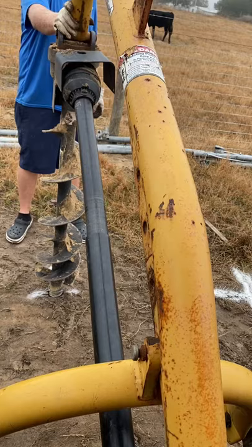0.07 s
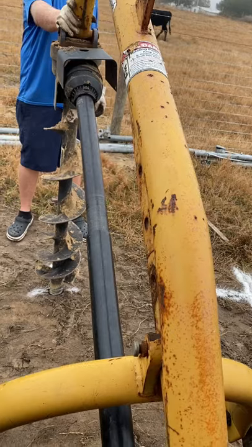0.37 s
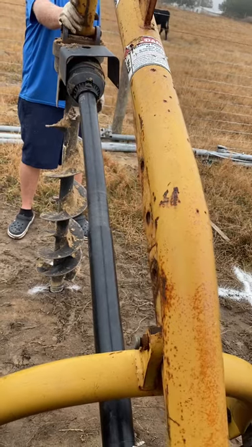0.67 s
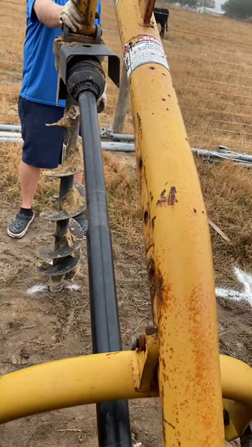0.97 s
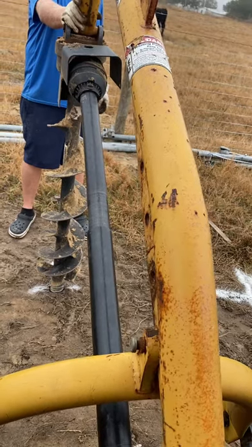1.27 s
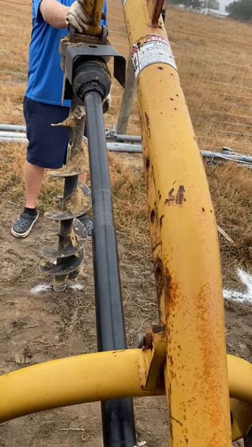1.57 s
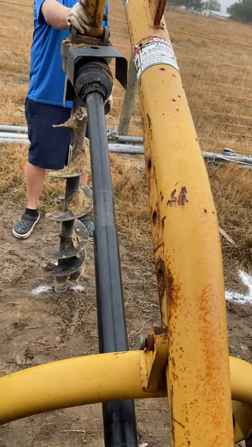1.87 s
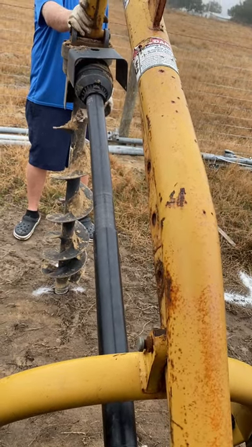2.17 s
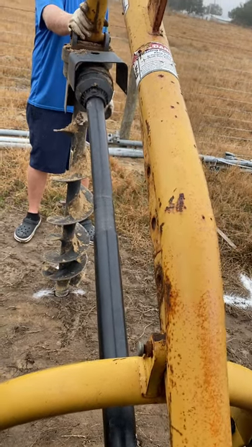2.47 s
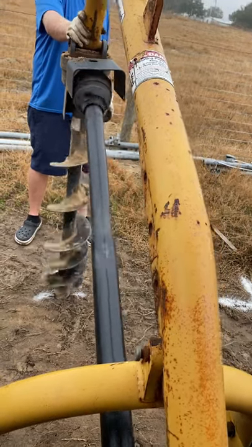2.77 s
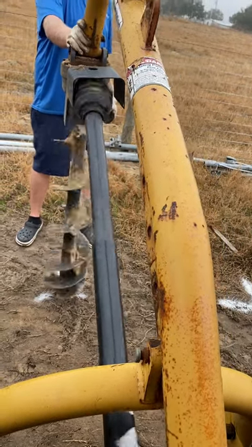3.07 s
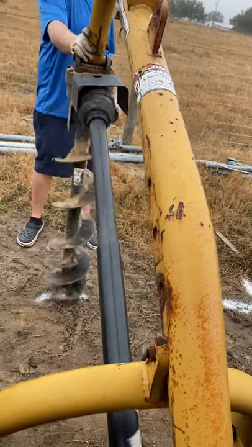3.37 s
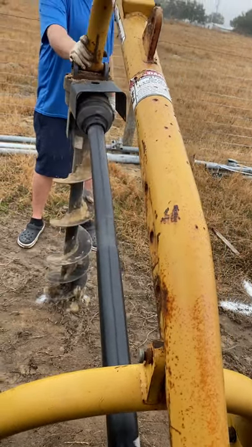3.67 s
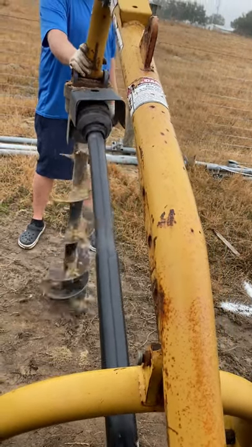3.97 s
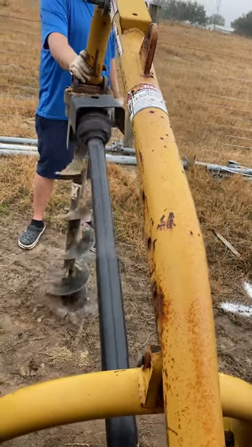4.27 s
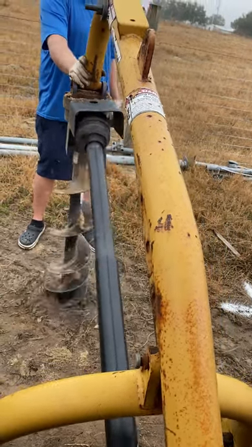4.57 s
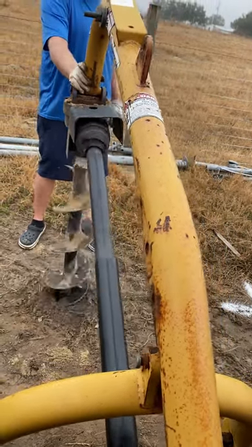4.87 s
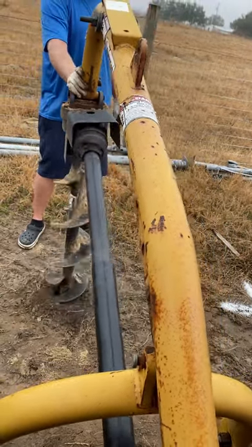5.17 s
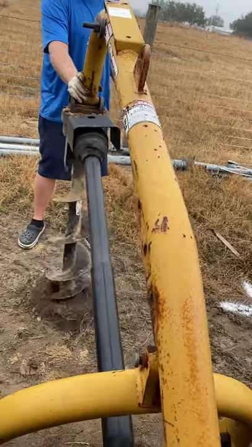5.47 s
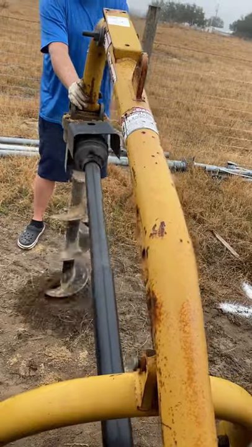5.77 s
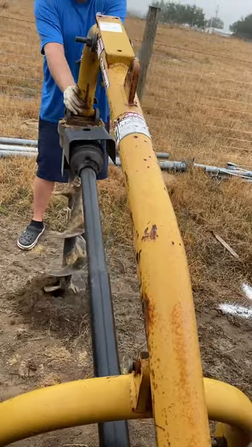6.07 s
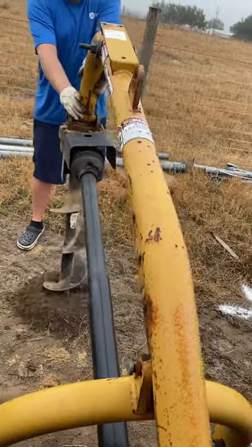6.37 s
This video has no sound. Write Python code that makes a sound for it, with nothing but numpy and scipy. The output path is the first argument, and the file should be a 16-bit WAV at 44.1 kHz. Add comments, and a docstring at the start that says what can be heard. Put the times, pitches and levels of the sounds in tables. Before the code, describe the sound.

A diesel tractor drones and clatters close by in an open field, with a steady hydraulic whine. A sharp steel clank comes first, then a short hiss of oil. A post-hole auger starts to turn, its shaft squeaking and its gearbox rattling in a quick, even rhythm. As it bites into dry soil, the blade groans and chatters louder, and grit sprays against the steel.

```python
"""In an open field a diesel tractor drones and clatters, its hydraulic pump whines and a steel linkage clanks.
Oil hisses through a valve as the boom comes down, and a post-hole auger starts to turn in dry soil.
Once a turn of its drive shaft the auger binds: stick-slip friction rings the flights and the blade,
harder as it bites deeper, while the gearbox rattles, the dry shaft squeaks and grit strikes the steel."""
import sys
import numpy as np
from scipy import signal
from scipy.fft import rfft, irfft, next_fast_len
from scipy.io import wavfile

SR = 44100
rng = np.random.default_rng(int(sys.argv[2]) if len(sys.argv) > 2 else 0)


def master(y):
    """Save y as 16-bit WAV."""
    cut = np.clip(np.atleast_2d(y).T, -1, 1)
    pcm = np.round(cut * 32767)  # scale
    wavfile.write(sys.argv[1], SR, pcm.astype(np.int16))


N = 283563
TIME = np.arange(N) / SR
SIZE = next_fast_len(N + SR // 4, True)
FREQS = np.maximum(np.arange(SIZE // 2 + 1) * SR / SIZE, 1)
PUMP_BEATS_PER_CYCLE = 26.24

# Balance of the two microphone ports. Each row: frequency in Hz, left minus right in dB.
PORT_BALANCE = [(60, 0), (230, 1.2), (350, 3), (700, .3), (1400, 1.5), (3000, -1.2), (7000, 0)]
# The auger binds once a turn. Each row: time in seconds, then levels in dB of the flights' groan,
# the gearbox's rattle and the blade's chatter.
AUGER_BINDS = [(2.693, -26, -29, -35), (2.855, -43, -27.5, -51), (3.005, -27, -27, -42),
               (3.144, -50, -29, -49), (3.285, -41, -28, -43), (3.435, -38, -26, -42),
               (3.582, -23, -28.5, -48), (3.731, -22, -27, -36), (3.882, -23, -23.5, -24),
               (4.018, -19, -26.5, -20.5), (4.183, -24.5, -27, -17), (4.321, -19, -24, -21.5),
               (4.473, -21.5, -25, -14.5), (4.623, -18, -28, -26), (4.772, -16, -26, -21),
               (4.918, -19, -24, -13), (5.069, -20, -26, -15.5), (5.22, -18, -25.5, -31),
               (5.366, -19.5, -25.5, -12), (5.514, -20.5, -21.5, -11.5), (5.665, -19, -23, -28),
               (5.814, -20, -23, -11), (5.964, -22, -24.5, -12), (6.112, -21.5, -24, -18),
               (6.259, -18.5, -27.5, -13.5), (6.407, -19.5, -22.5, -11)]
# Resonances of the gearbox. Each row: frequency in Hz, bandwidth in Hz, relative level in dB.
GEARBOX_MODES = [(1245, 178.7, 5.5), (1700, 950, -2.5), (2152, 134, 8), (2528, 38, 7), (2837, 35, 10),
                 (3030, 45, 10.5), (3170, 77, 2), (3245, 26, 4.5), (3478, 68, 3.5), (3695, 23, 0.5),
                 (3970, 53, -3), (4330, 29, 6), (6120, 1600, -12)]


def from_db(db):
    """Amplitude ratio of a level in decibels."""
    return 10 ** (np.asarray(db) / 20)


def rms_one(x):
    """Normalisation to unit power."""
    return x / np.sqrt(np.mean(x ** 2) + 1e-20)


def in_time(rows):
    """Linear interpolation of a time curve at every sample."""
    return np.interp(TIME, *np.transpose(rows))


def at_hz(points, hz):
    """Interpolation of a spectrum on a log-frequency axis."""
    point_hz, values = np.transpose(points)
    return np.interp(np.log(hz), np.log(point_hz), values)


def colour(x, points):
    """Filtering by multiplication of spectra."""
    return irfft(rfft(x, SIZE) * from_db(at_hz(points, FREQS)), SIZE)[:N]


def butterworth(x, order, hz, kind="low"):
    """Filtering with a maximally flat passband."""
    return signal.sosfilt(signal.butter(order, hz, kind, fs=SR, output="sos"), x + 1e-18)


def drift(per_s):
    """Random modulation of unit power: a line through independent values."""
    steps = rng.standard_normal(4096)
    return rms_one(np.interp(TIME * per_s, np.arange(len(steps)), steps))


def contacts(per_s, spread_db):
    """Shot noise of unit power: random clicks of uneven size."""
    sizes = from_db(spread_db * np.clip(rng.standard_normal(N), -2, 2)) * rng.choice([-1, 1], N)
    return rms_one(sizes * (rng.random(N) < per_s / SR))


def resonate(x, modes):
    """Superposition of damped modes, scaled so that white input keeps about its power."""
    out, power = 0, 0
    for k, (hz, width, db) in enumerate(modes):
        radius = np.exp(-np.pi * width / SR)
        gain = from_db(db) * (1 - radius ** 2) / 2
        poles = [1, -2 * radius * np.cos(2 * np.pi * hz / SR), radius ** 2]
        out = out + (-1) ** k * signal.lfilter([gain, 0, -gain], poles, x + 1e-18)
        power += gain * from_db(db)
    return out / np.sqrt(power)


def rough_tone(hz, wobble, flutter_db, per_s):
    """Uneven slips modulate a mode in frequency and amplitude; unit power."""
    pitch = hz * (1 + wobble * drift(per_s))
    return rms_one(from_db(flutter_db * drift(per_s)) * np.sin(2 * np.pi * np.cumsum(pitch) / SR))


def blows(times, levels_db, t60):
    """Impact envelopes: a sudden rise, then exponential decay by 60 dB in t60 seconds."""
    out, t = np.zeros(N + SR), TIME[:SR // 4]
    for at, db in zip(times, levels_db):
        start = int(at * SR)
        out[start:start + len(t)] += from_db(db - 60 * t / t60)
    return out[:N]


def swells(times, levels_db, rise_s, fall_s):
    """Gaussian envelopes with separate widths before and after each peak."""
    out = np.zeros(N)
    for at, db in zip(times, levels_db):
        near = slice(int(at * SR) - SR // 8, int(at * SR) + SR // 8)
        t = TIME[near] - at
        out[near] += from_db(db) * np.exp(-(t / np.where(t < 0, rise_s, fall_s)) ** 2 / 2)
    return out


def each_cycle(shape, cycles):
    """Periodic repetition of one engine cycle at the running speed."""
    return np.interp(cycles % 1 * len(shape), np.arange(len(shape) + 1), np.append(shape, shape[0]))


def ports(hz, pan_db=0, aside=1):
    """Level and phase differences at the two ports, as complex gains; sources near the axis lag less."""
    # Each row: frequency in Hz, phase lead of the left port in radians.
    port_phase = [(200, 0), (270, -.35), (360, -1.5), (500, -1.8), (700, -2.4), (1100, -2.9), (2800, -3.4),
                  (3900, -4.9), (5100, -3.3), (6000, -5.7), (8000, -4.7), (11000, -3.2)]
    balance_db = at_hz(PORT_BALANCE, hz) + pan_db
    left = from_db(balance_db / 2) * np.exp(.5j * aside * at_hz(port_phase, hz))
    return np.array([left, 1 / left])


def outdoors(near, far, scatter_db, scatter_s, aside=1, pan_db=0):
    """Scattering: a source's near side is heard directly, its far side as a brief spray of reflections."""
    # Scatter from frame and ground. Each row: frequency in Hz, relative level in dB.
    scatter = [(60, -41), (170, -27), (330, -2.5), (600, -10), (1100, -13), (1600, -2), (2900, -8),
               (5300, -2.5), (7000, 4), (12000, -20.5)]
    t = TIME[:SR // 5]
    reflections = rng.standard_normal(len(t)) * t * np.exp(-t / scatter_s)
    all_pass = np.exp(1j * np.angle(rfft(reflections, SIZE)))
    wet = from_db(at_hz(scatter, FREQS) + scatter_db)
    scattered = rfft(far, SIZE) * wet * all_pass * [[1], [-1]]  # opposite signs at the two ports
    paths = (rfft(near, SIZE) + scattered) / np.sqrt(1 + wet ** 2)
    return irfft(ports(FREQS, pan_db, aside) * paths, SIZE)[:, :N]


def exhaust(cycles, cycle_hz, load, level_db=-25, pipe_s=.005435, uneven_db=.77):
    """Four unequal firings give harmonics of the cycle rate; the pipe delays and smears the upper ones."""
    # Each row: multiple of the firing rate, relative level in dB.
    drone_lines = [(1, 0.5), (1.25, -13), (1.5, -14.5), (2, -5), (2.25, -14.5), (2.5, -12), (2.75, -5.5),
                   (3, -10), (3.25, -22), (3.5, -15), (3.75, -15.5), (4, -18), (4.25, -19), (4.5, -11),
                   (4.75, -21), (5, -12.5), (5.75, -25), (6, -21), (6.25, -18.5), (6.5, -16.5),
                   (6.75, -11.5), (7, -13), (7.25, -12.5), (7.5, -15.5), (7.75, -14), (8, -17),
                   (8.75, -12.5), (9, -22), (9.25, -19), (9.5, -24), (9.75, -20), (10, -32)]
    multiple, db = np.transpose(drone_lines)
    harmonic = np.round(multiple * 4).astype(int)
    hz = harmonic * cycle_hz
    smear_rad = np.interp(hz, [13, 270], [0, 2.06]) * rng.standard_normal(len(hz))
    lag_rad = 2 * np.pi * pipe_s * np.maximum(hz - hz / multiple, 0) + smear_rad
    spectrum = np.zeros((2, 2049), complex)
    spectrum[:, harmonic] = from_db(db) * np.exp(-1j * lag_rad) * ports(hz)
    puffs = np.array([each_cycle(shape, cycles + .6) for shape in irfft(spectrum)])
    drone = from_db(level_db + uneven_db * drift(40)) * rms_one(puffs)
    # More fuel under load makes the muffler boom.
    return drone + butterworth(drone, 1, [135, 165], "band") * load * from_db(-5.5)


def clatter(cycles, repeat_share=.58, knock_db=-.2, uneven_db=2, panel_db=-28.5):
    """Periodic valve and injector noise and random combustion and fan noise force the panels to ring."""
    # Each row: frequency in Hz, spectral density in dB.
    diesel_spectrum = [(20, -102), (45, -68), (85, -57.5), (200, -59.5), (300, -57.5), (380, -55.5),
                       (510, -64.5), (630, -71), (850, -57.5), (1200, -60.5), (1900, -70), (2400, -65.5),
                       (3000, -66.5), (3700, -71.5), (4800, -74.5), (6000, -86), (8000, -88.5),
                       (10500, -94), (12500, -114)]
    # Each row: frequency in Hz, bandwidth in Hz, relative level in dB.
    panel_modes = [(538, 143, -8), (774, 55, 5), (980, 24, -3.5), (1444, 74, 1), (1868, 35, -8),
                   (2204, 62, -1), (2340, 38, -25), (2816, 88, 0), (4735, 32, -13.5)]
    repeated = rms_one(each_cycle(signal.resample(rng.standard_normal(3000), 12000), cycles))
    knock = from_db(knock_db * np.cos(4 * np.pi * cycles) + uneven_db * drift(130))
    fresh = rng.standard_normal(N)
    noise = rms_one(knock * (np.sqrt(repeat_share) * repeated + np.sqrt(1 - repeat_share) * fresh))
    panels = from_db(panel_db) * rms_one(resonate(noise, panel_modes))
    return colour(noise * np.sqrt(SR / 2), diesel_spectrum) + panels


def pump(cycles, load, flutter_rad=.06, wander_rad=.22, waver_db=2, throb_db=1.8):
    """Meshing teeth whine in harmonics, modulated in phase by the crank and in level by the firings."""
    # Each row: harmonic number, free level in dB, loaded level in dB, left minus right in dB,
    # phase lead of the left in radians.
    whine_partials = [(1, -32.5, -34.5, 2.5, -1.65), (2, -35.5, -31.5, 0, -2), (3, -45.5, -45, 0, -1.5),
                      (4, -44, -34.5, 1.5, 1.43), (5, -39, -37, 1.5, 1.57), (6, -47, -50.5, -2.5, 0),
                      (7, -48, -64, -5, -1.5), (8, -42.5, -47, -3.5, 2), (9, -42, -42, -6.5, 3)]
    flutter = flutter_rad * (np.sin(2 * np.pi * cycles) + drift(25))
    mesh_phase = 2 * np.pi * cycles * PUMP_BEATS_PER_CYCLE + flutter
    sides, out = np.array([[.5], [-.5]]), 0
    for harmonic, free_db, loaded_db, pan_db, lead_rad in whine_partials:
        wander = 2 * np.pi * rng.random() + wander_rad * drift(70)
        tone = np.sqrt(2) * np.cos(harmonic * mesh_phase + wander + sides * lead_rad)
        throb = sum(np.cos(2 * np.pi * (k * cycles + rng.random())) for k in (1, 2, 4))
        db = free_db + (loaded_db - free_db) * load + waver_db * drift(22) + throb_db * throb
        out = out + tone * from_db(db + sides * pan_db)
    return out


def hydraulics(load, whistle_hz=7800, width_hz=99, whistle_db=-57):
    """Flow noise: oil whistles in a narrow band while it runs freely and hisses once the valve opens."""
    # Each row: time in seconds, level in dB.
    hiss_levels = [(0, -76), (2.17, -61.5), (2.26, -42.5), (2.6, -45), (2.76, -39.5), (2.86, -56.5),
                   (4, -55.5), (6.43, -44)]
    # Each row: frequency in Hz, relative level in dB.
    hiss_spectrum = [(1500, -31), (4000, -2.5), (6300, 1.5), (8500, 0), (10800, -1.5), (15000, -44)]
    whistle = resonate(rng.standard_normal(N), [(whistle_hz, width_hz, 0)])
    hiss = rms_one(colour(rng.standard_normal(N), hiss_spectrum))
    return whistle * from_db(whistle_db) * (1 - load) + hiss * from_db(in_time(hiss_levels))


def clank(crack_t60=.036, thud_t60=.06, split_hz=1800):
    """Impact on heavily damped steel: the linkage takes up its slack with a crack and a longer thud."""
    # Each row: start in seconds, crack level in dB, thud level in dB.
    impacts = [(1.038, -6, -14), (1.0435, -14, -7), (1.048, -18, -14), (6.373, -13, -18)]
    # Each row: frequency in Hz, relative level in dB.
    steel_spectrum = [(100, -29), (350, 8), (620, 10), (900, 17), (1300, 11), (2000, 10), (3000, 9.5),
                      (4400, 6), (5600, 3), (7500, -5), (11000, -8), (14000, -44)]
    at, crack_db, thud_db = np.transpose(impacts)
    noise = rms_one(colour(rng.standard_normal(N), steel_spectrum))
    thud = butterworth(noise, 2, split_hz) * blows(at, thud_db, thud_t60)
    crack = butterworth(noise, 2, split_hz, "high") * blows(at, crack_db, crack_t60)
    return thud - crack


def soil(touch_s=2.37, bite_s=1, spin_from_s=2.57, spin_up_s=.42, full_db=-27.5, range_db=2.5):
    """Friction: the tip grinds louder as it sinks; each bind is a burst of slips that rings the flights."""
    # Each row: frequency in Hz, bandwidth in Hz, relative level in dB.
    flight_modes = [(542.5, 86, -2), (586, 72, 3), (710, 83, -5.5), (821, 41, -2), (985, 81, -7)]
    # Each row: frequency in Hz, relative level in dB.
    rumble_spectrum = [(60, -14), (110, -5), (160, -0.5), (260, 1), (350, -5), (450, -5.5), (580, -2),
                       (850, -6), (1300, -13), (2500, -19), (4500, -22.5), (7000, -46), (12000, -55)]
    at, groan_db, _, _ = np.transpose(AUGER_BINDS)
    slips = swells(at, groan_db, rise_s=.026, fall_s=.035) * contacts(per_s=2500, spread_db=.5)
    shallow = np.exp(-np.maximum(TIME - touch_s, 0) / bite_s)
    speed = np.clip((TIME - spin_from_s) / spin_up_s, 0, 1)
    rumble = rms_one(colour(contacts(per_s=4500, spread_db=3), rumble_spectrum))
    return resonate(slips, flight_modes) + speed * from_db(full_db - range_db * shallow) * rumble


def shaft(mode_hz=2190, upper_hz=2497, width_hz=16):
    """Narrow resonances of the dry, hollow shaft jangle and squeak until the soil damps them."""
    # Each row of both: time in seconds, level in dB.
    jangle_levels = [(2.58, -66), (2.66, -31.5), (2.9, -42.5), (3.1, -31.5), (3.6, -39), (4.3, -49.5),
                     (6.43, -60)]
    squeaks = [(2.708, -24.5), (2.862, -28), (3.027, -29), (3.1, -29), (3.152, -29.5), (3.455, -27),
               (3.59, -26.5), (3.765, -33), (3.92, -25), (4.031, -26), (4.205, -34)]
    modes = [(mode_hz, width_hz, 0), (upper_hz, width_hz, -10)]
    jangle = from_db(in_time(jangle_levels)) * resonate(contacts(per_s=350, spread_db=3), modes)
    squeal = rough_tone(mode_hz, wobble=.024, flutter_db=5, per_s=350)
    return jangle + swells(*np.transpose(squeaks), rise_s=.019, fall_s=.013) * squeal


def gearbox(contact_hz=7760):
    """Impact excitation: under each bind, greased teeth and joints knock unevenly and ring the gearbox."""
    at, _, rattle_db, _ = np.transpose(AUGER_BINDS)
    force = swells(at, rattle_db, rise_s=.034, fall_s=.025) * contacts(per_s=330, spread_db=3)
    return resonate(butterworth(force, 2, contact_hz), GEARBOX_MODES)


def blade(rise_s=.019, fall_s=.0149, lead_s=.012, again_s=.0499, again_db=-8.5):
    """Stick-slip locks to the blade's close modes just before each bind peaks, then again more weakly."""
    # Each row: frequency in Hz, relative level in dB.
    blade_modes = [(772, -5.5), (822, 2.5), (885, -9)]
    at, _, _, chatter_db = np.transpose(AUGER_BINDS)
    first = swells(at - lead_s, chatter_db, rise_s, fall_s)
    second = swells(at - lead_s + again_s, chatter_db + again_db, rise_s, fall_s)
    # The second catch is lower, and the pitch wanders from clod to clod.
    pitch = np.where(second > first, .965, 1) * (1 + .015 * drift(30))
    ring = sum(from_db(db) * rough_tone(hz * pitch, wobble=.025, flutter_db=3.2, per_s=160)
               for hz, db in blade_modes)
    return (first + second) * rms_one(ring) / 2


def backlash(rebound_s=.011, contact_t60=.0042, contact_hz=4700, clack_hz=3150, clack_width_hz=700):
    """Impact and rebound: slack in the drive snaps shut, bounces twice and rings the gearbox."""
    # Each row: start in seconds, level in dB, change at each rebound in dB.
    knocks = [(2.690, -4, -6), (3.021, -7, -5), (3.136, -8, -7), (3.281, -7, -6), (3.571, -6, -7),
              (3.727, -7, -6), (4.016, -3, -8), (4.163, -8, -4), (4.208, -4, -12), (4.310, -7, -3),
              (4.446, -5, -1), (4.607, -3.5, -1), (4.746, -4.5, 0), (5.053, -3, -3), (5.351, -2, -1.5),
              (5.798, -6, -4), (6.245, -6, -2)]
    at, db, change_db = np.transpose(knocks)
    envelope = sum(blows(at + k * rebound_s, db + k * change_db, contact_t60) for k in range(3))
    force = butterworth(envelope * rng.choice([-1, 1], N), 4, contact_hz)  # grease softens the contact
    return resonate(force, GEARBOX_MODES + [(clack_hz, clack_width_hz, 0)])


def grit(fall_back_s=.032, fall_back_db=-9.5, crack_s=.0054):
    """Shot noise: sprays of grains strike the steel and partly fall back; brittle clods fracture."""
    # Each row: time in seconds, spray level in dB, crack level in dB.
    throws = [(2.952, -28, -60), (3.111, -27.5, -60), (3.153, -36, -62), (3.269, -23.5, -50),
              (3.426, -27, -28.5), (3.577, -26.5, -23), (3.732, -28, -63), (3.762, -35, -50),
              (3.886, -27, -33), (4.043, -28, -60), (4.2, -41, -25), (4.224, -39, -29), (4.349, -30, -26),
              (4.504, -26, -19), (4.655, -28, -27), (4.802, -26.5, -60), (4.955, -28, -63),
              (5.117, -27.5, -28), (5.27, -33, -50), (5.422, -40, -21), (5.576, -40, -21),
              (5.729, -30.5, -45), (6.014, -31.5, -60), (6.052, -44, -24), (6.336, -34, -36)]
    # Each row of both: frequency in Hz, gain in dB.
    grain_spectrum = [(500, -22), (2000, 15), (4000, 5), (6200, 4), (8200, 5.5), (10000, 4), (15000, 6)]
    crack_spectrum = [(4000, -22), (6500, -14), (8200, -8), (9600, -7), (12000, 11), (14000, 14),
                      (15600, 19), (17000, -16)]
    at, db, crack_db = np.transpose(throws)
    sprays = swells([*at, *(at + fall_back_s)], [*db, *(db + fall_back_db)], rise_s=.0097, fall_s=.0088)
    cracks = swells(at, crack_db, crack_s, crack_s) * contacts(per_s=800, spread_db=3)
    grains = rms_one(colour(contacts(per_s=1800, spread_db=7), grain_spectrum))
    return sprays * grains + colour(cracks, crack_spectrum)


def scene():
    """Superposition of tractor and auger; large parts radiate different noise from near and far sides."""
    # Pitch of the engine-driven pump. Each row: time in seconds, frequency in Hz.
    pump_pitch = [(0.0, 354.9), (1.2, 354.4), (1.7, 355.1), (2.6, 353.5), (3.3, 356), (4.3, 354.8),
                  (5.1, 354.1), (6.43, 352.2)]
    # Load as the boom presses down. Each row: time in seconds, share from 0 to 1.
    pump_load = [(2.2, 0), (2.75, 0.3), (3.5, 0.63), (5, 1), (6.43, 0.96)]
    cycle_hz = in_time(pump_pitch) / PUMP_BEATS_PER_CYCLE
    cycles = np.cumsum(cycle_hz) / SR
    load = in_time(pump_load)
    drone = exhaust(cycles, cycle_hz.mean(), load)
    oil = hydraulics(load)
    block = [oil + clatter(cycles) for side in ("near", "far")]
    tractor = drone + outdoors(*block, scatter_db=-1.5, scatter_s=.0055) + pump(cycles, load)
    chatter = blade()
    digging = [chatter + soil() for side in ("near", "far")]
    groan = outdoors(*digging, scatter_db=1.5, scatter_s=.003, aside=.63, pan_db=.5)
    drive = gearbox() + shaft()
    rattle = outdoors(drive, drive, scatter_db=4, scatter_s=.0039)
    impacts = grit() + clank() + backlash()
    return tractor + groan + rattle + outdoors(impacts, impacts, scatter_db=-1.5, scatter_s=.0014)


def limiter(x, threshold_db=-3.5, most_db=4.5, attack_s=.02, release_db_per_s=26):
    """Gain reduction: a peak above the threshold pulls the gain down quickly, and it creeps back."""
    over_db = np.clip(20 * np.log10(np.abs(x).max(axis=0) + 1e-9) - threshold_db, 0, most_db)
    release_db = release_db_per_s * TIME
    held_db = np.maximum.accumulate(over_db + release_db) - release_db
    pole = np.exp(-1 / (attack_s * SR))
    return x * from_db(-signal.lfilter([1 - pole], [1, -pole], held_db))


def record(dry, mic_top_hz=9600, cutoff_hz=15800):
    """Band and peak limiting: the microphone loses the top octave; limiter, clipping and top cut follow."""
    dull = butterworth(dry, 4, mic_top_hz)
    clipped = np.clip(limiter(dull), -.85, .85)
    fade_in = np.clip((TIME - .035) / .002, 0, 1)
    top_cut = signal.ellip(10, .1, 80, cutoff_hz, fs=SR, output="sos")
    return signal.sosfilt(top_cut, clipped * fade_in)


dry = scene()
out = record(dry)
master(out)
```